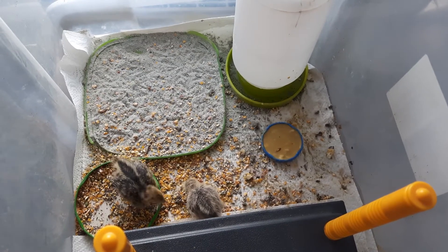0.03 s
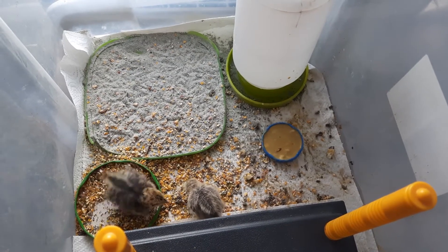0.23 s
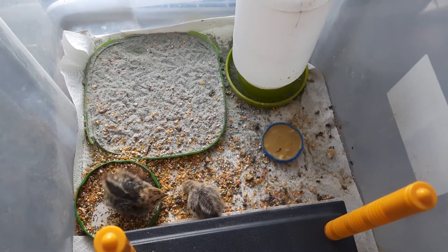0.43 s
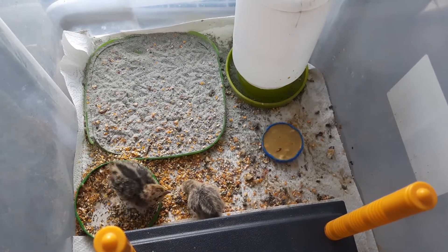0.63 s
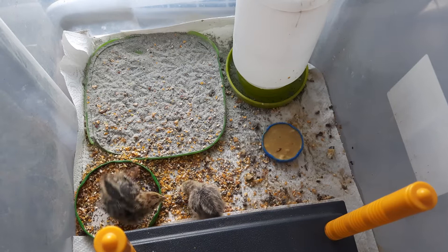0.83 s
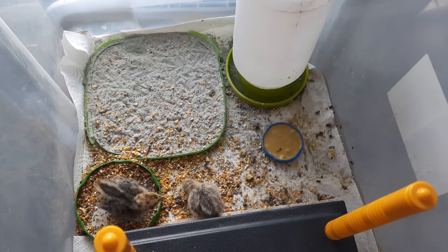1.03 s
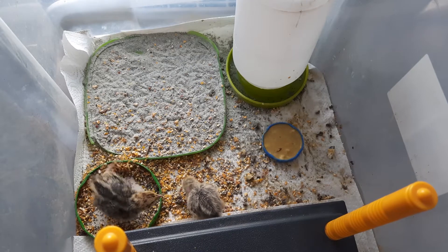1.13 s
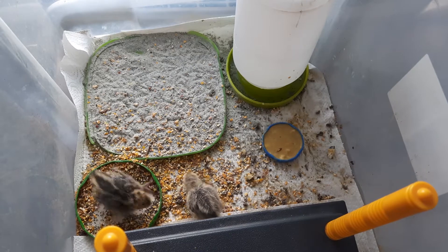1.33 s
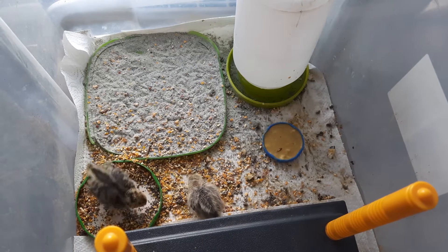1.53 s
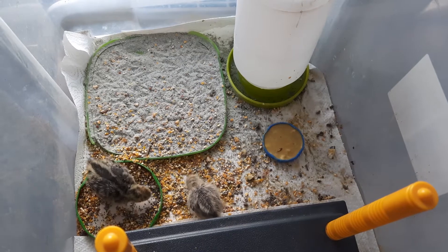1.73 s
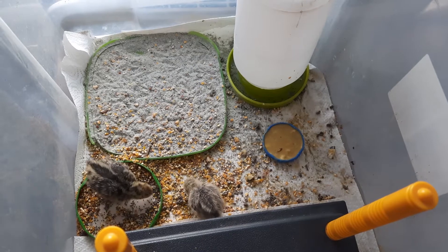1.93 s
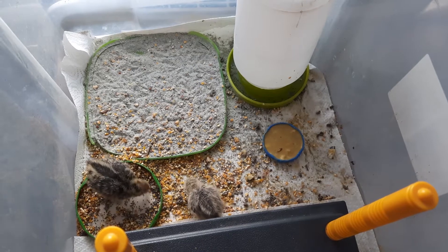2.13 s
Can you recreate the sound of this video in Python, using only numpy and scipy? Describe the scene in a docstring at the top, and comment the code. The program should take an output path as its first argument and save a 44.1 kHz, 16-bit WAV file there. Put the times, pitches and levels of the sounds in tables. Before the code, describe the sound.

A chick scratches and pecks in loose grain inside a plastic tub, with faint peeps.

```python
"""Inside a plastic brooder tub, stereo microphone close above a chick that scratches in loose grain.
Each stroke of a foot or beak stirs a swarm of tiny seed clicks; pecks snap, and now and then
something small and metallic rings. The tub floor thumps and booms softly, a few faint peeps slip out,
and the walls return a short echo. Quiet room tone lies underneath."""
import sys
import numpy as np
from scipy import signal
from scipy.fft import rfft, irfft
from scipy.io import wavfile
from scipy.ndimage import uniform_filter1d

SR = 44100
rng = np.random.default_rng(int(sys.argv[2]) if len(sys.argv) > 2 else 0)


def int16_out(signal):
    """Quantize to a 16-bit WAV file."""
    q = np.round(np.clip(np.atleast_2d(signal).T, -1, 1) * 32767)
    wavfile.write(sys.argv[1], SR, q.astype(np.int16))


N = 97020
T = np.arange(N) / SR
SEEDS_PER_S, BODY_HZ = 1900, 4200


def amp(db):
    """Decibels to gain."""
    return 10 ** (np.asarray(db) / 20)


def unit(x):
    """Scales to rms 1."""
    return x / np.sqrt(np.mean(x ** 2) + 1e-20)


def read(points, hz):
    """Reads a table on a log-frequency axis."""
    f, value = np.transpose(points)
    return np.interp(np.log(hz + 1), np.log(f + 1), value)


def add(mix, s, sound):
    """Mixes a sound in at time s."""
    part = mix[..., max(round(s * SR), 0):][..., :sound.shape[-1]]
    part += sound[..., :part.shape[-1]]


def convolve(x, response):
    """Convolves along time, up to the scene's length."""
    return signal.fftconvolve(np.atleast_2d(x), np.atleast_2d(response), axes=1)[:, :N]


def colour(points, size=4096):
    """Causal filter with the given spectrum."""
    log_gain = np.log(amp(read(points, abs(np.fft.fftfreq(size, 1 / SR)))))
    return np.fft.ifft(np.exp(np.conj(signal.hilbert(log_gain)))).real[:size // 2]


def tinted(x, points):
    """Colours a sound with a filter of unit energy."""
    taps = colour(points)
    return convolve(x, taps / np.linalg.norm(taps))


def flattened(x, size=161):
    """Evens out the broad shape of a short sound's spectrum, leaving unit energy."""
    spectrum = rfft(np.pad(x, ((0, 0), (size, size))))
    smooth_power = uniform_filter1d(uniform_filter1d(abs(spectrum) ** 2, size), size)
    return irfft(spectrum / np.sqrt(abs(smooth_power) + 1e-20))[:, size:-size]


def with_body(x, body_db):
    """Raises or lowers the body: everything under BODY_HZ."""
    body = signal.sosfiltfilt(signal.butter(2, BODY_HZ, fs=SR, output="sos"), x)
    return x + (amp(body_db) - 1) * body


def swell(peak, rise, fall):
    """Exponential rise and fall of one stroke."""
    return np.exp(-np.maximum((peak - T) / rise, (T - peak) / fall))


def waver(span, size=SR // 10):
    """Random drift of rms 1, smoothed over span samples."""
    return unit(uniform_filter1d(rng.standard_normal(size), span))


def wash(points, shared=.615):
    """Coloured noise, mostly common to both sides of the microphone."""
    middle = np.sqrt(shared) * rng.standard_normal(N)
    sides = np.sqrt(1 - shared) * rng.standard_normal((2, N))
    return unit(tinted(middle + sides, points))


# decay between the tub walls: f/Hz, t60/s
WALL_DECAY = [(300, 0.087), (2200, 0.1522), (5000, 0.1084), (15000, 0.0391)]

def tub_echo(wet_db, size=12000, near_decay_s=.002454, left_lead_s=.0002357):
    """From one spot in the tub to the microphone: direct sound, near walls, short tail."""
    t = np.arange(size) / SR
    near, tail = rng.standard_normal((2, 2, size))
    near *= (rng.random((2, size)) < .25) * np.exp(-t / near_decay_s) * (t > left_lead_s)
    hz, age, spectra = signal.stft(tail, SR, nperseg=128)
    decay = amp(-60 * age / read(WALL_DECAY, hz)[:, None])
    tail = signal.istft(spectra * decay, SR, nperseg=128)[1][:, :size]
    out = amp(wet_db) * (amp(6.5) * unit(near) + amp(1.5) * unit(tail)) / np.sqrt(size)
    out[0, 0] += 1  # the direct sound reaches the left side first
    out[1, round(left_lead_s * SR)] += 1
    return unit(out) / np.sqrt(size)


# the room around the tub: f/Hz, relative level/dB
ROOM_COLOUR = [(20, -63.5), (40, 4.5), (65, 0.5), (100, -4.5), (170, -7), (270, -12), (450, -10.5),
               (800, -24), (1500, -30.5), (2200, -20), (4000, -43), (9000, -33), (16000, -61.5)]

def room_tone():
    """Steady, low noise of the room."""
    return amp(-69.5) * wash(ROOM_COLOUR)


# strokes through the grain, close below the microphone: peak t/s, level/dB, rise/s, fall/s, body/dB
STROKES = [(.005, -54, 0.0214, 0.0356, 3.5), (0.037, -57, 0.023, 0.0133, 2),
           (.12, -65.5, 0.0166, 0.0055, -6), (0.205, -41.5, 0.0173, 0.054, -2.5),
           (.245, -41.5, 0.0097, 0.0296, 4), (0.277, -42.5, 0.0115, 0.0221, 2),
           (0.357, -44, 0.0277, 0.0408, -0.5), (0.427, -54.5, 0.045, 0.0376, -8.5),
           (0.493, -49, 0.0278, 0.016, -2), (0.52, -38.5, 0.0105, 0.0042, -14),
           (0.56, -44, 0.011, 0.0237, -0.5), (0.64, -39.5, 0.01296, 0.0161, -0.5),
           (0.684, -40, 0.01, 0.0354, -5), (0.715, -40, .008, 0.0114, 0.5),
           (0.768, -50.5, 0.0178, 0.0142, 6), (0.809, -39, 0.0165, 0.0248, -2),
           (0.862, -47, 0.0126, 0.0127, -4), (0.89, -46.5, 0.0083, 0.0189, 3),
           (0.931, -52, 0.007, 0.0243, -0.5), (.968, -55, .01, 0.0213, -1.5),
           (1.013, -53, 0.0136, 0.039, 5), (1.055, -47.5, 0.0081, 0.0061, 0),
           (1.13, -43, 0.0203, 0.0293, 1), (1.155, -38, 0.0089, 0.0101, -11), (1.19, -56, 0.014, 0.074, 1),
           (1.237, -53.5, 0.0154, 0.0215, 5.5), (1.302, -58.5, .012, 0.078, 1),
           (1.348, -48, 0.0092, 0.0197, -4), (1.375, -45, 0.0124, 0.0444, -4),
           (1.42, -45.5, 0.0158, 0.0535, -1.5), (1.461, -47, 0.028, 0.0101, -2),
           (1.515, -69.5, .012, 0.029, 9), (1.601, -48.5, 0.0054, 0.0239, 4),
           (1.635, -61, 0.0104, 0.0738, 4), (1.671, -57.5, 0.0064, 0.0274, 9),
           (1.829, -74, .012, 0.0297, 10), (1.95, -71, 0.0146, 0.0265, -12),
           (2.016, -68.5, 0.0052, 0.0331, 13), (2.12, -65.5, 0.005, 0.044, -9),
           (2.175, -70.5, .014, 0.058, -23)]
# seed clicks at close range: f/Hz, relative level/dB
SEED_COLOUR = [(60, -23), (200, -7.5), (420, -7.5), (700, -11.5), (1100, -4), (1400, 1), (1650, -6.5),
               (1950, 1.5), (2400, 1), (3500, 0), (4700, -2), (6000, 0.5), (7300, 2), (8500, 1),
               (10300, -2), (12000, -1.5), (13500, -2), (15000, 1), (16000, -1.5)]

def rustle(kinds=16, spread_db=3.8, clump_db=2.6, clump_s=.003):
    """Strokes stir swarms of uneven seed clicks; each kind of seed rings at its own pitch and spot."""
    sizes = amp(spread_db * np.minimum(rng.exponential(1, N), 4))
    clicks = sizes * rng.choice([-1, 1], N) * (rng.random(N) < SEEDS_PER_S / SR)
    clicks /= np.sqrt(abs(uniform_filter1d(clicks ** 2, 500)) + 1e-6)  # even out the swarm's power
    clicks = unit(clicks * amp(clump_db * waver(round(clump_s * SR), N)))
    kind = rng.integers(0, kinds, N)
    power = np.array([(amp(db) * swell(s, rise, fall)) ** 2 for s, db, rise, fall, _ in STROKES]) + 1e-20
    total = power.sum(0)
    body_db = np.array(STROKES)[:, 4] @ power / total  # the loudest stroke counts most
    out = np.zeros((2, N))
    for k, hz in enumerate(np.geomspace(2000, 11000, kinds)):
        echo = tub_echo(wet_db=-2)
        ring = signal.lfilter(*signal.iirpeak(hz, Q=12, fs=SR), echo)
        seed = unit(echo + 3 * ring) / np.sqrt(echo.shape[1])
        out += convolve(clicks * (kind == k) * np.sqrt(total), seed)
    return tinted(with_body(out, body_db), SEED_COLOUR)


# the tub floor under shuffling feet: f/Hz, relative level/dB
SHUFFLE_COLOUR = [(20, -35), (60, -2), (130, 0), (260, 1), (450, -8), (800, -15.5), (3000, -72.5)]

def shuffle():
    """The tub floor rumbles under the strokes."""
    effort = sum(amp(db) * swell(s, rise, fall) for s, db, rise, fall, _ in STROKES)
    return amp(-69.5) * unit(effort ** .81 * wash(SHUFFLE_COLOUR))


# thumps on the tub floor: t/s, level/dB, half-width/s, boom/dB, left minus right/dB
THUMPS = [(.045, -57, 0.00316, -13.5, 13), (0.2197, -36, 0.001186, -20, -7.5),
          (0.2234, -44, 0.00132, -0.5, -4), (0.232, -39.5, 0.001103, -4.5, -5),
          (0.2528, -38.5, 0.00115, -8, -6.5), (0.394, -51.5, 0.0026, -19.5, 17.5),
          (0.588, -56.5, 0.00276, -17, 15.5), (0.736, -55.5, 0.00176, -10.5, 6),
          (0.788, -57.5, 0.000365, -4.5, -8), (0.864, -50.5, 0.00174, -11.5, -5),
          (1.071, -58.5, 0.00081, 0, -9), (1.123, -71.5, 0.0012, 10, -9.5),
          (1.229, -52, 0.0015, -7.5, -7.5), (1.6937, -63, 0.000663, -12, -33),
          (1.7548, -54.5, 0.000845, -17.5, -25), (1.795, -51, 0.00086, -23, -21.5),
          (2.012, -64, 0.00276, 7, -7)]
# the tub's low modes: f/Hz, relative level/dB, t60/s
TUB_MODES = [(71.09, 2, 0.562), (112.85, -8, 0.274), (174.53, -7.5, 0.454), (261.2, -9.5, 0.503)]

def thumps():
    """A soft push and rebound of the tub floor, which then booms."""
    out = np.zeros((2, N))
    for s, db, width, boom_db, pan_db in THUMPS:
        u, age = (T - s) / width, np.maximum(T - s, 0)
        push = u * np.exp((1 - u ** 2) / 2)
        boom = sum(amp(level - 60 * age / t60) * np.sin(2 * np.pi * hz * age)
                   for hz, level, t60 in TUB_MODES)
        out += amp([[db + pan_db / 2], [db - pan_db / 2]]) * (push + amp(boom_db) * boom)
    return out


# touches on metal in the tub: t/s, level/dB, dulling/(dB per octave)
CLINKS = [(.054, -52, 8), (.061, -52, 8), (.229, -25.5, 0), (.2435, -39, 4), (.388, -50, 14),
          (.462, -50, 14), (.5105, -38.5, 3), (.528, -41, 2), (.663, -39, 9)]
# the metal's modes: f/Hz, relative level/dB, t60/s
METAL_MODES = [(5500, -6, .11), (7048, -5, .11), (8480, -5, .1), (8535, -12, .1), (9250, -14, .1),
               (9458, -10, .11), (9822, -9, .1), (11240, -15, .1), (11620, -12, .1), (11910, -12, .08),
               (12950, -13, .08), (13660, -7.5, .09), (14030, -9, .07), (14720, -8, .07), (15400, -9, .08),
               (15608, -8, .06)]

def clinks(attack_s=.0003, dull_above_hz=7048):
    """Small metal rings in the same high modes at every touch; soft touches ring duller."""
    out, t = np.zeros((2, N)), np.arange(SR // 4) / SR
    for s, db, dull_db in CLINKS:
        ring = np.zeros_like(t)
        for hz, level, t60 in METAL_MODES:
            uneven_db, phase = rng.standard_normal(2)
            mode_db = level + uneven_db - dull_db * max(np.log2(hz / dull_above_hz), 0)
            ring += amp(mode_db - 60 * t / t60) * np.sin(2 * np.pi * (hz * t + phase))
        add(out, s, amp(db) * ring * (1 - np.exp(-t / attack_s)))
    return convolve(out, tub_echo(wet_db=-14))


# pecks and seed snaps, close below the microphone: t/s, relative level/dB, body/dB, decay/s
PECKS = [(0.2282, -21.5, -22.5, 0.0031), (0.232, -32, -4.5, 0.0024), (0.2434, -29.5, -1.5, 0.0027),
         (0.272, -35, 0.5, 0.00077), (0.315, -47.5, -16.5, 0.00081), (0.4589, -35.5, -3.5, 0.00162),
         (0.4904, -48, -7.5, 0.00048), (0.5091, -28, -22, 0.0044), (0.527, -36.5, -3, 0.0041),
         (0.56, -36.5, -2, 0.00086), (0.6738, -22.5, 7, 0.00138), (0.685, -30, -3.5, 0.00068),
         (0.7084, -34, 5, 0.00102), (0.7174, -34.5, -1, 0.00049), (0.765, -43, 11, 0.00116),
         (0.7994, -39, -4, 0.00093), (0.92, -29, -6.5, 0.00096), (1.001, -50, 2.5, 0.00042),
         (1.0497, -44, -9.5, 0.00116), (1.116, -49.5, 5.5, 0.0009), (1.1288, -42.5, 3, 0.00136),
         (1.149, -39.5, -4, 0.00123), (1.159, -36.5, -3, 0.00193), (1.2417, -43.5, 1, 0.00112),
         (1.271, -41, 0.5, 0.00077), (1.294, -54.5, 6.5, 0.0012), (1.3465, -47.5, -0.5, 0.00083),
         (1.372, -41, -2, 0.00066), (1.419, -42, 9.5, .001), (1.48, -43.5, 4.5, 0.00067),
         (1.5216, -49.5, 8.5, 0.0019), (1.578, -47, 2, 0.0052), (1.583, -40, -7.5, 0.00193),
         (1.602, -46, 2.5, 0.00082), (1.665, -40, 2, 0.0022), (1.6679, -37.5, -0.5, 0.00254),
         (1.81, -65, 20.5, 0.0028), (2.004, -59.5, 20, 0.002)]
# a peck at close range: f/Hz, relative level/dB
PECK_COLOUR = [(60, -6), (300, -23.5), (520, -22), (700, -15.5), (1050, -4.5), (1450, -8.5), (1800, 4),
               (2400, 7.5), (3500, 1), (5000, -0.5), (8000, 4.5), (10500, 3), (12500, -1.5), (15500, 9)]

def pecks(size=1024, span_s=.004):
    """A beak or claw snaps against seed: a very short crunch."""
    out, t = np.zeros((2, N)), np.arange(size) / SR
    for s, db, body_db, decay in PECKS:
        burst = rng.standard_normal(size) * np.exp(-t / decay)
        crunch = flattened(convolve(burst, tub_echo(wet_db=-4)))
        gain = amp(db) * np.sqrt(span_s * SR)  # the energy of that level held for span_s
        add(out, s, gain * with_body(crunch, body_db))
    return tinted(out, PECK_COLOUR)


# knocks, ticks and scrapes in the tub: peak t/s, level/dB, rise/s, fall/s, f/Hz, width/octaves
KNOCKS_AND_SCRAPES = [(0.679, -46, 0.0041, 0.0204, 1037, 0.544), (0.682, -44, 0.00215, 0.0505, 2310, 1.72),
                      (.81, -60.5, 0.0312, 0.0363, 364, 1.21), (1.07, -61, 0.029, 0.038, 307.5, 0.83),
                      (1.125, -55, 0.0107, 0.0305, 1404, 0.43), (1.419, -55.5, 0.0039, 0.0347, 388, 1.063),
                      (1.81, -60.5, .001, 0.0048, 4713, 0.32), (2.001, -50, 0.00164, 0.0075, 4200, 1.383)]

def knocks_and_scrapes():
    """Beak or foot knocks, ticks or scrapes: a gritty burst in one band, sharp or slowly swelling."""
    out = np.zeros((2, N))
    for s, db, rise, fall, hz, octaves in KNOCKS_AND_SCRAPES:
        edges = hz * 2 ** (np.array([-.5, .5]) * octaves)
        grit = rng.standard_normal(N) * (rng.random(N) < SEEDS_PER_S / SR)
        band = signal.sosfilt(signal.butter(2, edges, "band", fs=SR, output="sos"), grit)
        out += amp(db) * swell(s, rise, fall) * unit(convolve(band, tub_echo(wet_db=-13)))
    return out


# the chick's voice, faint even this close:
# t/s, length/s, f/Hz at the start, a third, two thirds and the end, level/dB, octave overtone/dB
PEEPS = [(.765, .032, 2380, 2250, 2220, 2270, -52, -26), (1.17, .024, 2150, 2430, 2600, 2540, -53, -26),
         (1.193, .013, 2300, 2300, 2420, 2650, -56, -26), (1.699, .042, 2780, 2420, 2300, 2260, -46, -21),
         (1.869, .042, 2250, 2390, 2210, 2370, -58, -30), (1.963, .036, 2330, 2900, 2980, 2660, -69.5, -30)]

def peeps(jitter=.005, rasp_depth=.08, echo_rise_s=.007):
    """Nearly pure whistles bend in pitch, swell and stop quickly; the tub returns them a moment later."""
    out = np.zeros(N)
    for s, length, *pitches, db, octave_db in PEEPS:
        u = np.arange(0, length, 1 / SR) / length
        bend = np.polyfit(np.linspace(0, 1, 4), pitches, 3)
        hz = np.polyval(bend, u) * (1 + jitter * waver(60)[:len(u)])
        phase = 2 * np.pi * np.cumsum(hz) / SR
        envelope = np.sin(np.pi / 2 * np.interp(u, [0, .8, 1], [0, 1, 0]))
        rasp = 1 + rasp_depth * waver(45)[:len(u)]
        add(out, s, amp(db) * envelope * rasp * (np.sin(phase) + amp(octave_db) * np.sin(2 * phase)))
    echo = tub_echo(wet_db=20)
    walls = flattened(echo * np.minimum(T[:echo.shape[1]] / echo_rise_s, 1) ** 2)
    return out + amp(-5) * convolve(out, walls)


def scene():
    """The chick in its tub, heard from close above, over quiet room tone."""
    contacts = rustle() + pecks() + knocks_and_scrapes() + clinks() + thumps()
    return contacts + peeps() + shuffle() + room_tone()


# the microphone's two ports: f/Hz, left minus right/dB
PORT_BALANCE = [(60, 8), (300, 4.5), (800, -1.5), (1500, -1.5), (2300, 1), (3000, 1.5), (4800, 0.5),
                (6000, 0.5), (7200, -12.5), (8000, -2.5), (8700, 6), (9500, 8.5), (10500, 2.5), (12000, 10),
                (16000, 1.5)]

def record(dry, low_cut_hz=45.2, high_cut_hz=15900):
    """The microphone above the tub: each port has its own colour, and both ends of the band are cut."""
    ports = np.array([colour([(hz, side * db / 2) for hz, db in PORT_BALANCE]) for side in (1, -1)])
    low_cut = signal.butter(3, low_cut_hz, "high", fs=SR, output="sos")
    high_cut = signal.firwin(401, high_cut_hz, window=("kaiser", 8), fs=SR)
    picked_up = signal.sosfilt(low_cut, convolve(dry, ports))
    return signal.oaconvolve(picked_up, high_cut[None], "same", axes=1)


dry = scene()
out = record(dry)
int16_out(out)
```